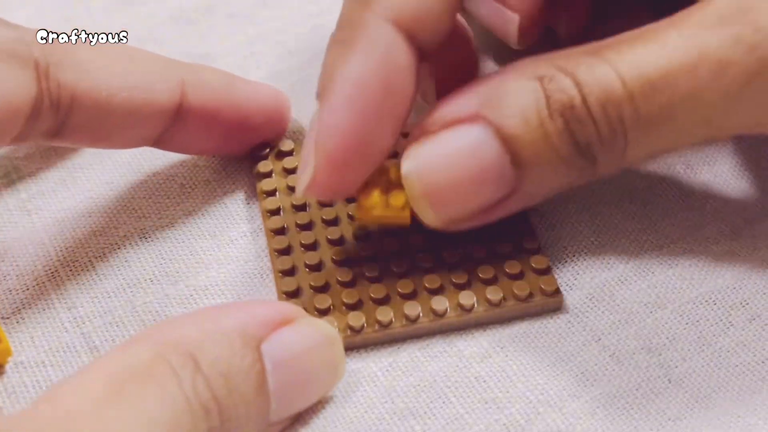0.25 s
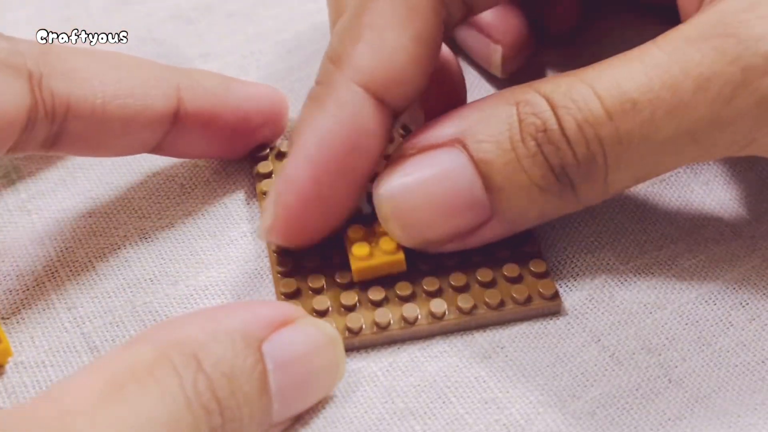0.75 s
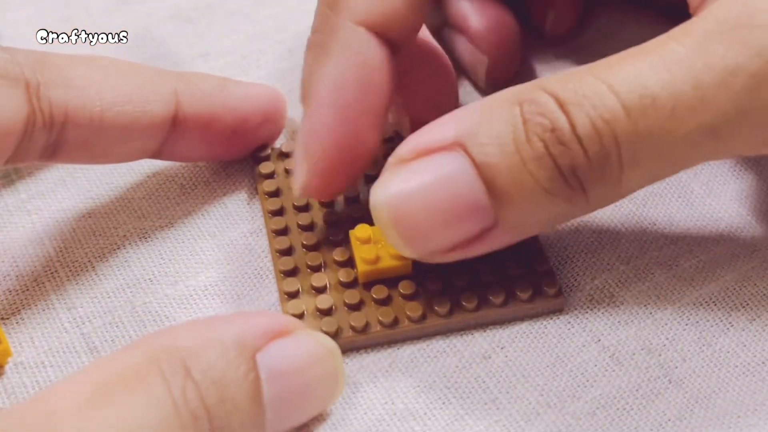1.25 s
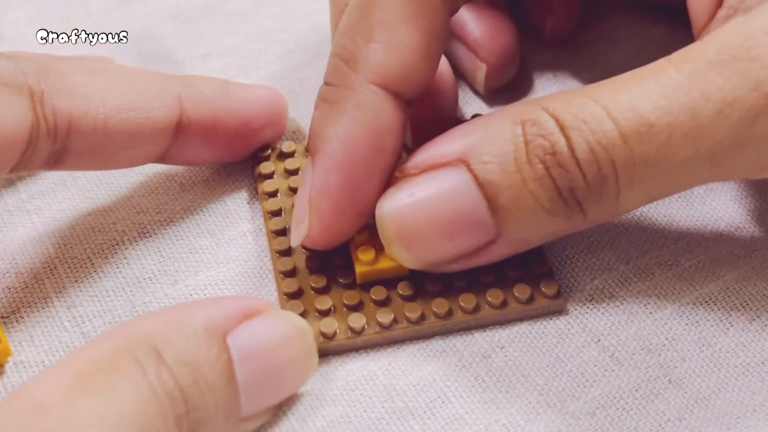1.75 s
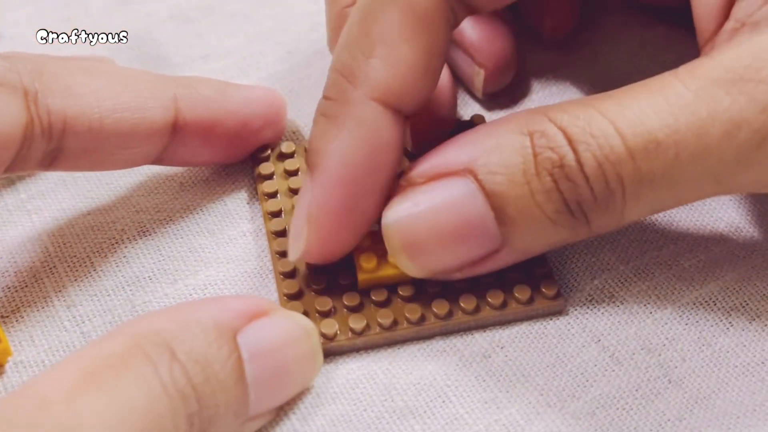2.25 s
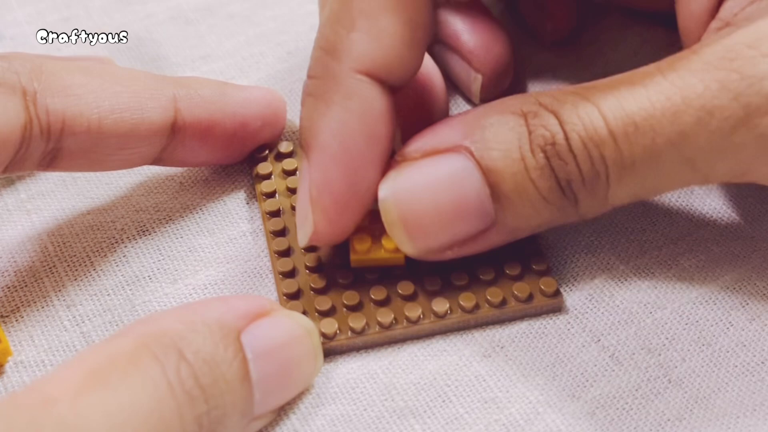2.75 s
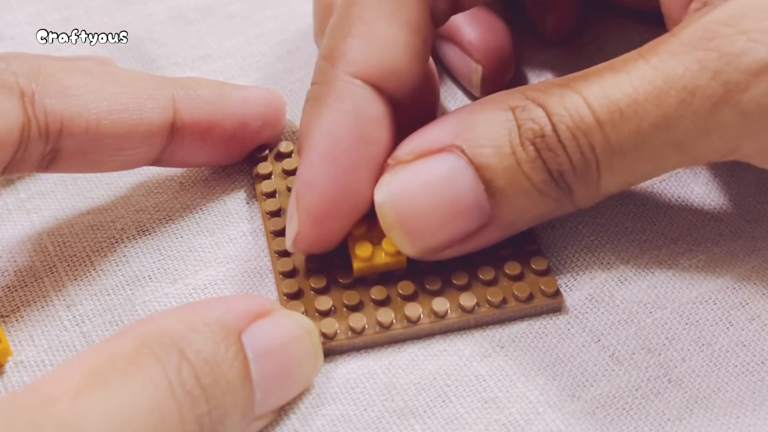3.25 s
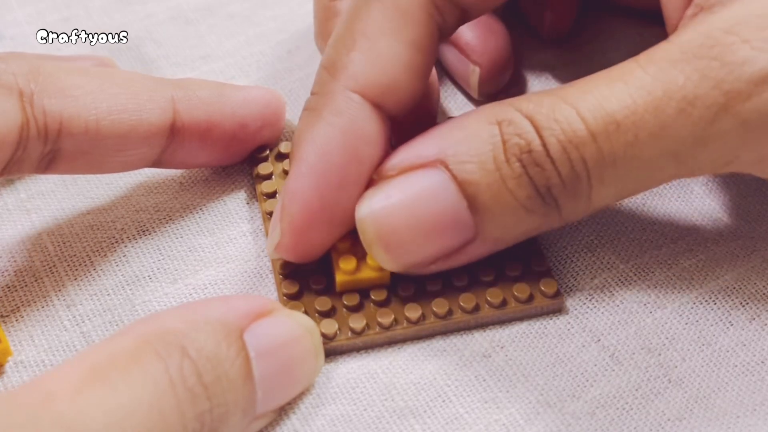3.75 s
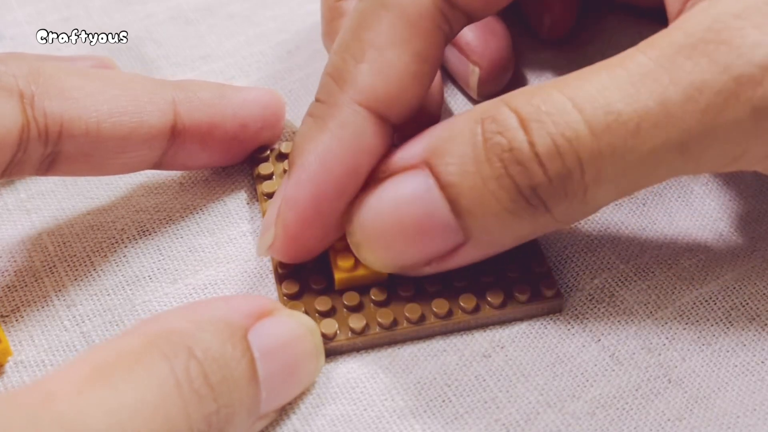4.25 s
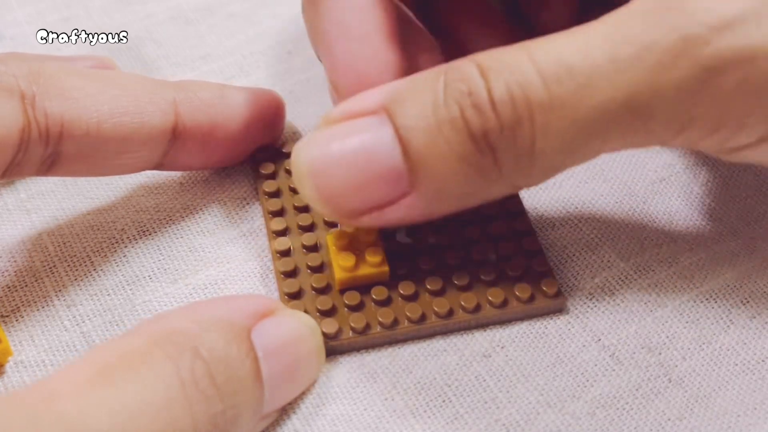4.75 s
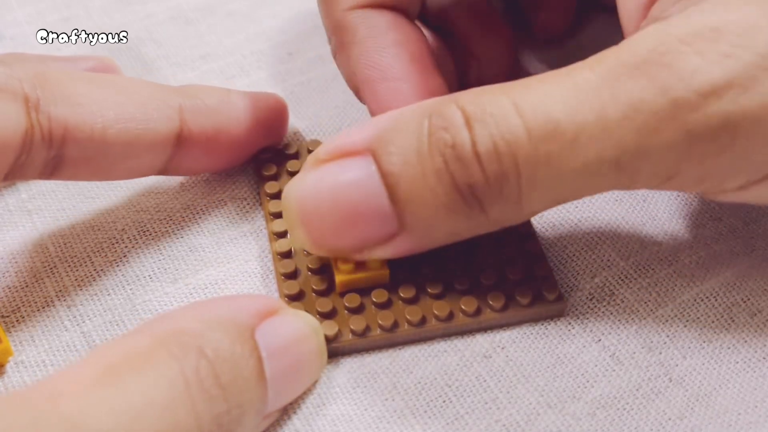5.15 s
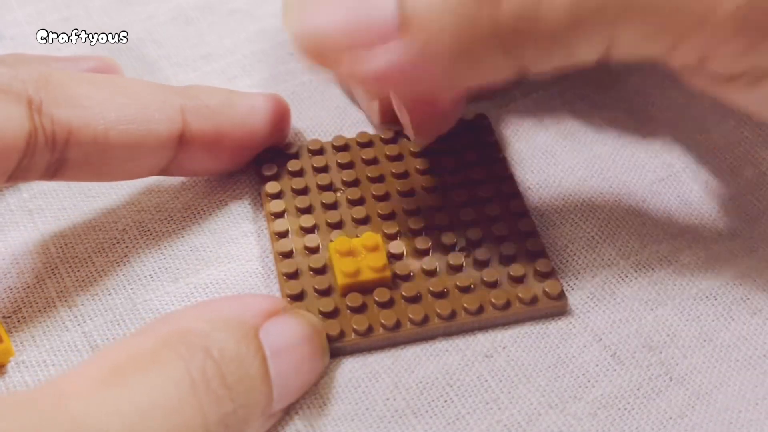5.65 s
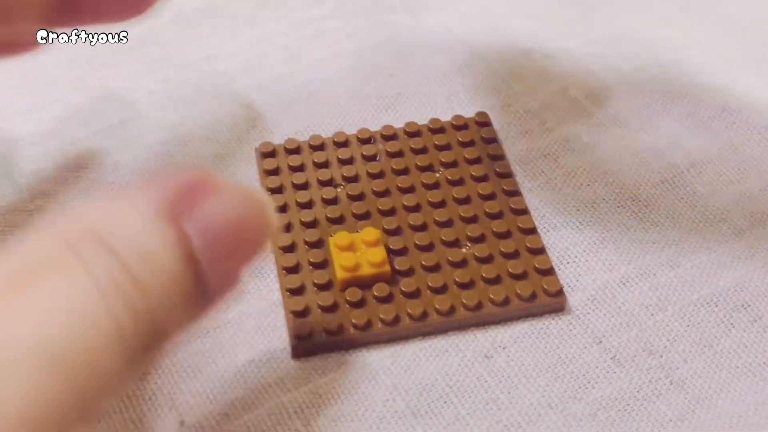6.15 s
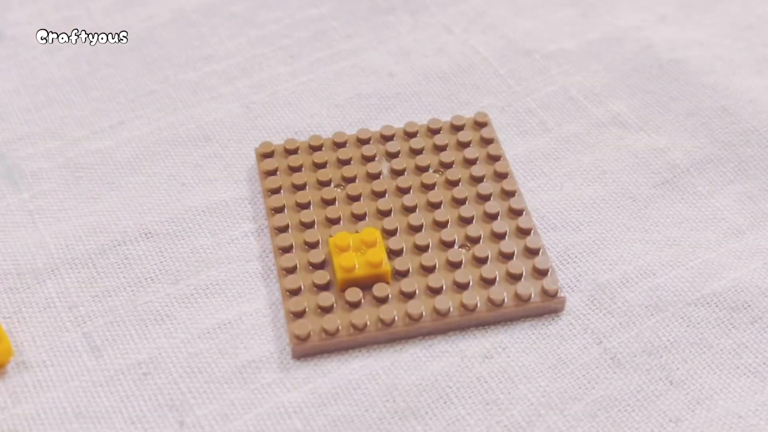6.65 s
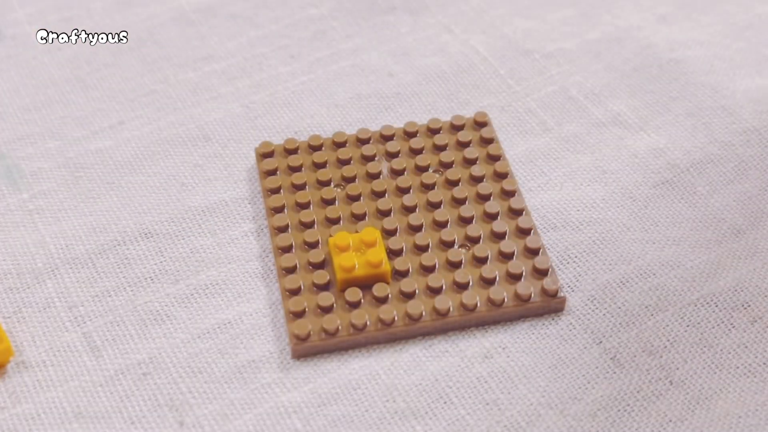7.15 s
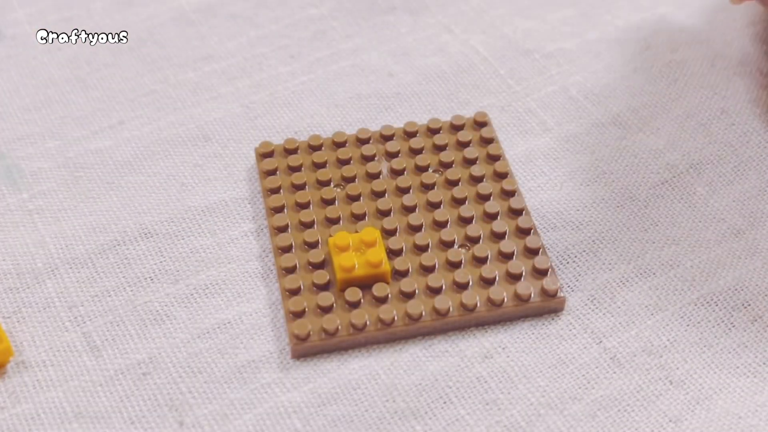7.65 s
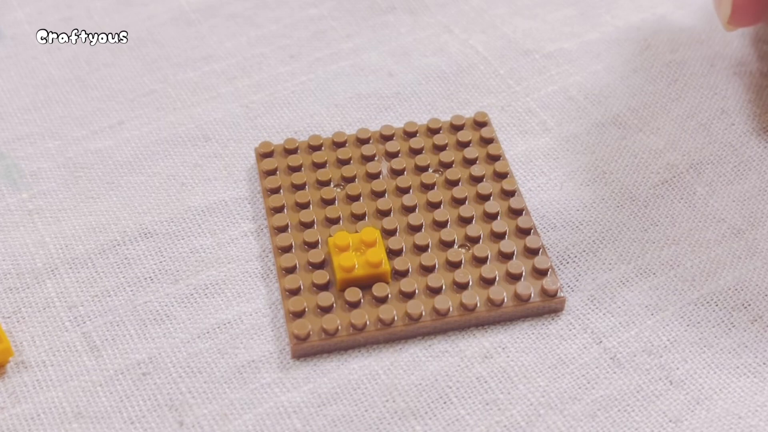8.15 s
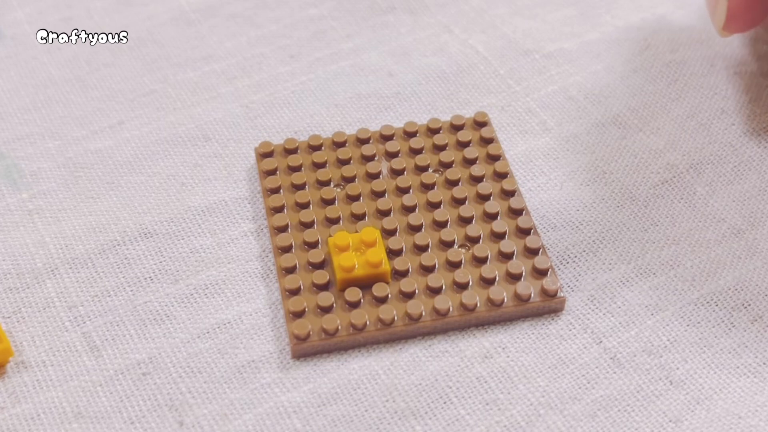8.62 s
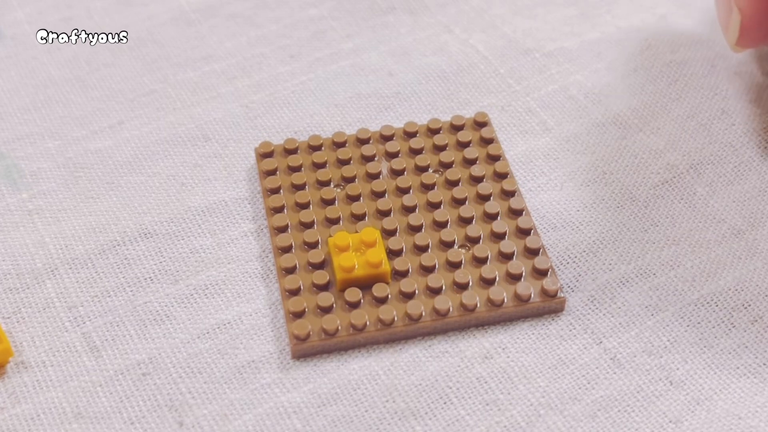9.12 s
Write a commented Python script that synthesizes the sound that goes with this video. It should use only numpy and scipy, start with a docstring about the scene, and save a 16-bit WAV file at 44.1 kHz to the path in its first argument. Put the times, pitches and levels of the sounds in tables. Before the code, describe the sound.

Tiny plastic brick ticks and scrapes over studs, snaps into place with sharp clicks, faint skin rustle, over a steady throbbing low appliance hum.

```python
"""Fingers seat a small plastic brick on a baseplate lying on a cloth-covered table, then tap it.
Brick: grainy slip forces ring damped modes of plate, brick, studs and edges, plus a dry crack;
it ticks and scrapes over the studs and creaks home in a run of snaps.
Presses thud as low table modes; skin rustles on cloth as coloured noise with tiny snags.
Behind: beating appliance motors, mains hum and whine from sines, and air from filtered noise."""
import sys
import numpy as np
from scipy import signal
from scipy.fft import rfft, irfft
from scipy.io import wavfile

SR = 44100
rng = np.random.default_rng(int(sys.argv[2]) if len(sys.argv) > 2 else 0)


def materialize(psi):
    """Save the field psi as 16-bit PCM at rate SR to the path in sys.argv[1].

    A 1-D psi becomes a single channel; in a 2-D psi each row is a channel.
    """
    bounded = np.clip(np.atleast_2d(psi).T, -1, 1)
    quanta = np.round(bounded * 32767).astype(np.int16)
    wavfile.write(sys.argv[1], SR, quanta)


N = 413658
TIME = np.arange(N) / SR
FREQS = np.arange(N // 2 + 1) * SR / N
LEAD_S = 0.003  # silence ahead of each slip in its buffer


def undb(db):
    """Decibels to gain."""
    return 10 ** (np.asarray(db) / 20)


def unit(x):
    """Scale to rms 1."""
    return x / np.sqrt(np.mean(x ** 2) + 1e-30)


def over_hz(rows, axis=1, freqs=FREQS):
    """One column of a table, interpolated along log frequency."""
    rows = np.array(rows, float)
    return np.interp(np.log(freqs + 1), np.log(rows[:, 0]), rows[:, axis])


def noise(gain):
    """Noise with the given gain at each frequency."""
    return irfft(rfft(rng.standard_normal(N)) * gain, N)


def walk(rate_hz):
    """Slow random wander of rms 1."""
    return unit(noise(1 / (1 + (FREQS / rate_hz) ** 4)))


def pan(left_minus_right_db):
    """Left and right gains for a level difference."""
    return undb(np.array([[left_minus_right_db], [-left_minus_right_db]]) / 2)


def add(out, start_s, sound):
    """Mix a stereo sound in at a time."""
    i = max(int(start_s * SR), 0)
    out[:, i:i + sound.shape[1]] += sound[:, :N - i]


def bricks(tilt_share=0.49, even_edge_db=-9):
    """Ticks, scrapes and snaps on the studs; grip tunes and damps the brick, the spot pressed tunes the plate."""
    # contacts of brick and plate: t/s, slip length/ms, brick pitch/Hz, plate pitch/Hz, ring time factor,
    # relative brick level/dB, then level re brick/dB of plate, studs, edges, dry crack
    contacts = [(0.0428, 2.3, 2720, 1160, 1.4, -56.5, 7, -20, -24, -20),
                (0.2177, 1, 3200, 1200, 1, -84, -6, 2, 10, -6),
                (0.447, 1.1, 3320, 1180, 0.57, -51.5, -20, -11, -17.5, -10),
                (0.5598, 2.1, 3500, 1190, 1, -66, -7, -6, -10, -6),
                (0.577, 0.5, 3500, 1500, .7, -54, -9, -16, -18, -8),
                (0.5837, 0.82, 3000, 1400, 0.61, -56.5, -13, -12, -19, -6),
                (0.656, 1.3, 3300, 1190, 1, -79, -3, 4, 1, -6),
                (0.725, 4.7, 3120, 1190, 1, -57, -9, -17, -22, -16),
                (0.7321, 0.7, 3180, 1190, 1, -51, -15, -12.5, -10, -16),
                (0.735, 1.2, 3240, 1190, 1.2, -50.5, -16, -9, -5.5, -7),
                (0.7384, 2.2, 3200, 1190, 1.2, -61, -16, -7, -4, -8),
                (0.746, 1.7, 3180, 1190, 1, -59, -16, -7, -18, -4),
                (0.75, 6.5, 3250, 1190, 0.8, -51, -19, -14, -17, -13),
                (0.7563, 10, 3230, 1190, 1.2, -52.5, -16, -9, -20, -15),
                (1.3416, 1.8, 2800, 1290, 0.99, -56.5, -9, -4, -11.5, -2),
                (1.4, 1.5, 2810, 1190, 1, -67.5, -8, -9, -16, -6),
                (2.4218, 0.36, 3120, 1190, 1.3, -56, -16, -10, -16, -12),
                (2.5023, 0.67, 3000, 1190, 0.91, -71.5, -3, -14, -21, -10),
                (3.085, 1.4, 3260, 1190, 0.84, -69.5, -2, -12, -21, -11),
                (3.622, 1.6, 3240, 1190, 0.9, -66, -3, -11, -7, -10),
                (3.636, 1.14, 2870, 1550, 0.46, -59.5, -5, -10, -3, 1),
                (4.0897, 6.6, 2800, 1390, 0.68, -64, 6, -16, -5, -12),
                (4.626, 28, 2960, 1190, 1, -68.5, 0, -15, -3.5, -14),
                (4.9833, 1.6, 2900, 1190, 1, -70.5, 4, -15, -8, -12),
                (5.0248, 0.66, 2930, 1330, .8, -59.5, 1.5, -14, -8, -10),
                (5.0626, 1.4, 2990, 1050, 1.2, -50, -6, -12, -2, -24),
                (5.1055, 1.3, 2900, 1350, 1, -50, -2.5, -9, -3.5, -18),
                (5.1406, 0.94, 2920, 1320, 1.1, -51, -6, -11, -2.5, -18),
                (5.181, 1.1, 3160, 1200, .9, -47.5, 0, -12, -5, -18),
                (5.2252, 0.84, 3450, 1220, 1.2, -52.5, -7, -4.5, -1.5, -8),
                (5.2267, 0.57, 3420, 1160, 1.1, -50.5, 0, -10, -12, -8),
                (5.344, 1, 2720, 1180, 1.2, -63, 5, -23, -25, -16),
                (5.4875, 0.88, 3000, 1190, 1, -73, 0, -10, -7, -5),
                (5.501, 1.5, 3200, 1190, 1.5, -73.5, -3, -7, -8, -4),
                (5.814, 2.7, 2800, 1500, 1, -66.5, 2, -9, -12, -4),
                (5.834, 2, 3400, 1190, 1, -80, -3, 9, -3, -6),
                (5.8395, 0.8, 3400, 1190, 1, -74, -3, 10, -5, -3),
                (5.921, 4.3, 2900, 1190, 4.5, -68.5, -10, -15, -6, -18),
                (6.107, 0.82, 2720, 1450, 0.54, -68.5, -6, -1, -1, 3),
                (6.393, 1.4, 3020, 1190, 1, -76, -3, -8, 3.5, -6),
                (8.41, 19, 3540, 1190, 1, -74.5, 0, -6, -16, -7),
                (9.017, 1.8, 3000, 1400, 1, -80, 18, -2, -13, 0),
                (9.055, 22, 4000, 1190, 1, -70, -8, -1, -14, -10)]
    # modes of loose brick and plate, three each for plate, brick, studs, edges: f/Hz, t60/ms, level/dB
    plastic_modes = np.array([(913, 17, 0.5), (1232, 10, -1), (1520, 11, 2), (2610, 5, 0), (3070, 6, 4.5),
                              (3620, 3.7, -0.5), (4550, 6, -1.5), (5720, 5.9, -4), (6870, 3, 0.5),
                              (9330, 3.3, -0.5), (10900, 4.8, -0.5), (12300, 1.9, 3.5)])
    out = np.zeros((2, N))
    plate_mode_hz, brick_mode_hz = plastic_modes[[1, 4], 0]
    for t_s, slip_ms, brick_hz, plate_hz, ringing, db, plate_db, stud_db, edge_db, crack_db in contacts:
        part_db = db + np.array([plate_db, 0, stud_db, edge_db])
        modes = plastic_modes * [1, ringing, 1]
        tunings = [plate_hz / plate_mode_hz, brick_hz / brick_mode_hz, 1, 1]
        # a soft contact barely rings the edges and favours lower modes (dB per octave)
        tilt_db = tilt_share * (edge_db - even_edge_db)
        body = click(modes, slip_ms, part_db, tunings, [0, tilt_db, tilt_db, tilt_db])
        add(out, t_s - LEAD_S, body + undb(db + crack_db) * crack(slip_ms))
    return out


def click(mode_table, slip_ms, part_db, tunings, tilts_db, scatter=0.029):
    """A slip rings each part of the plastic; each contact point shifts the modes a little."""
    force, out = slip(slip_ms), 0
    parts = np.split(np.array(mode_table), len(part_db))
    for modes, db, tuning, tilt_db in zip(parts, part_db, tunings, tilts_db):
        part = 0
        for k, (hz, t60_ms, mode_db) in enumerate(modes):
            hz = hz * tuning * np.exp(scatter * rng.standard_normal())
            gain = undb(mode_db + tilt_db * np.log2(hz / modes[1, 0]))
            part = part + (-1) ** k * gain * unit(ring(force, hz, t60_ms).imag)
        # each part radiates well only around its own modes
        edges_hz = [0.77 * tuning * modes[0, 0], 1.04 * tuning * modes[-1, 0]]
        band = signal.butter(1, edges_hz, "bandpass", fs=SR, output="sos")
        out = out + undb(db) * unit(signal.sosfilt(band, part))
    return from_plate(out) / 2


def slip(slip_ms, grit=0.74, flat=0.97):
    """The force of one slip: a short cluster of tiny catches with a nearly even spectrum."""
    t_s = np.arange(int(0.04 * SR)) / SR - LEAD_S
    age = np.maximum(1000 * t_s / slip_ms, 0)  # in slip lengths
    catches = rng.standard_normal(len(t_s)) * np.exp(grit * rng.standard_normal(len(t_s)))
    force = rfft(age * np.exp(-2 * age ** 2) * catches)
    size = abs(force)
    return irfft(force / (size + 0.064 * size.mean()) ** flat)


def ring(push, hz, t60_ms):
    """One damped mode driven by a force, as a rotating phasor."""
    pole = np.exp((2j * np.pi * hz - np.log(1000) * 1000 / t60_ms) / SR)
    return signal.lfilter([1, -1], [1, -pole], push)


def crack(slip_ms):
    """The dry, pitchless snap of the contact itself: a slip force without modes."""
    # passband edges: f/Hz
    band_hz = [1600, 6500]
    band = signal.butter(2, band_hz, "bandpass", fs=SR, output="sos")
    return from_plate(unit(signal.sosfilt(band, slip(slip_ms)))) / 2


def from_plate(x):
    """Carry a sound from the plate to the two sides, each with its own phase and level."""
    # stereo path from the plate: f/Hz, left lead/rad, left minus right/dB
    paths = [(550, 1, -1), (950, 1, 4), (1500, 2, 7), (2280, 0.86, 4.5), (3200, 1.25, 7), (4370, 1.3, 6.5),
             (5140, 1.9, 6.5), (8930, -4, -1.5), (10200, -5, 0), (13300, -7.5, -0.5), (15300, -9, 0.5)]
    freqs = np.fft.rfftfreq(len(x), 1 / SR)
    level = undb(over_hz(paths, axis=2, freqs=freqs) / 2)
    lean = level * np.exp(0.5j * over_hz(paths, freqs=freqs))
    sides = np.array([lean, 1 / lean])
    sides = sides / np.sqrt(np.mean(abs(sides) ** 2, axis=0))
    return irfft(rfft(x) * sides, len(x))


def taps():
    """The seated brick and the plate ring as one body when a finger lands or lets go."""
    # finger contacts: t/s, slip length/ms, then relative level/dB of plate, bending plate, brick, studs, edges
    touches = [(5.3943, 2.1, -53, -54, -62, -66, -61), (9.0452, 1.1, -43, -62, -46.5, -53, -55.5),
               (9.2263, 2.8, -67, -50, -61, -55.5, -61)]
    # modes once locked together, three for each of those five parts: f/Hz, t60/ms, level/dB
    seated_modes = [(730, 27, 1.5), (1240, 8.3, -1.5), (1660, 13, 4), (1930, 13, 4.5), (2300, 14, -2.5),
                    (3000, 12, 3.5), (3670, 13, 0), (4000, 13, -2), (4870, 5.9, 4.5), (5650, 9, 1),
                    (6320, 6.4, -4), (7240, 4, 1), (8850, 4, 3.5), (11000, 4.3, -1), (12800, 3, 1)]
    out = np.zeros((2, N))
    for t_s, slip_ms, *part_db in touches:
        tunings, tilts_db = np.ones(len(part_db)), np.zeros(len(part_db))
        add(out, t_s - LEAD_S, click(seated_modes, slip_ms, part_db, tunings, tilts_db))
    return out


def table(spread_rad=0.48, scuff_db=1, scuff_s=0.015, bloom_cycles=0.4):
    """A press through the cloth: high modes die at once, a low one booms on; soft fingers reach only the lowest."""
    # presses that reach the table: t/s, relative level/dB, contact hardness as corner f/Hz
    presses = [(0.0453, -27.5, 330), (0.104, -33, 170), (1.343, -20.5, 62), (5.062, -50, 1200),
               (5.106, -49, 1200), (5.141, -48, 1200), (5.182, -47, 750), (5.226, -37, 900),
               (5.345, -30.5, 650), (5.358, -41, 300), (5.396, -37, 450), (9.029, -29, 65),
               (9.0466, -40, 1300)]
    # table modes: f/Hz, t60/ms, level/dB
    table_modes = [(88, 130, -8), (121.5, 175, 1), (238, 63, -3), (335, 43, 1.5), (461, 47, -4),
                   (580, 32, -1.5), (790, 16, -6)]
    out, t = np.zeros((2, N)), np.arange(SR // 3) / SR
    for t_s, db, corner_hz in presses:
        # the plate scuffs on the cloth as it is pushed down
        dull = signal.butter(2, corner_hz, fs=SR, output="sos")
        scuff = rng.standard_normal((2, len(t))) * np.exp(-t / scuff_s)
        thud = undb(scuff_db) * signal.sosfilt(dull, scuff)
        for k, (hz, t60_ms, mode_db) in enumerate(table_modes):
            phase = spread_rad * hz / 600 * rng.standard_normal((2, 1))  # spread at 600 Hz
            fade = np.exp(-np.log(1000) * 1000 * t / t60_ms)
            bloom = 1 - np.exp(-(t * hz / bloom_cycles) ** 2)
            gain = (-1) ** k * undb(mode_db) / (1 + (hz / corner_hz) ** 2)
            thud = thud + gain * bloom * fade * np.sin(2 * np.pi * hz * t + phase)
        add(out, t_s, undb(db) * thud)
    return out


def rustle(rub_db=11.5, grain_db=-0.5, catch_db=1.5, apart=0.11, snag_db=-9, snags_per_s=90, resting_db=-102):
    """Skin drags over threads: a fine grainy hiss, with tiny ticks where a thread snags and lets go."""
    # strokes of skin over cloth and plastic: start t/s, length/s, level before rub_db/dB
    strokes = [(-0.04, 0.19, -80.5), (0.148, 0.16, -91.5), (0.516, 0.27, -89), (0.958, 0.078, -92.5),
               (1.59, 0.056, -87), (2.019, 0.28, -100), (3.37, 0.099, -100), (3.58, 0.077, -85.5),
               (4.053, 0.042, -86), (4.274, 0.046, -92), (4.423, 0.48, -92.5), (4.986, 0.56, -88.5),
               (5.205, 0.092, -82), (5.676, 0.25, -76.5), (6.034, 0.088, -88.5), (6.23, 0.089, -87.5),
               (6.368, 0.086, -81), (6.508, 0.14, -83.5), (7.016, 0.52, -94), (7.63, 0.057, -95),
               (8.164, 0.062, -91), (9.058, 0.045, -90), (9.115, 0.14, -80.5), (9.254, 0.033, -71.5)]
    # relative spectrum of the rub: f/Hz, density/dB per Hz
    rub_colour = [(300, -8), (1500, 7), (3000, 3.5), (4500, 2), (6500, 0), (8200, -3.5), (10500, 4.5),
                  (13000, 5), (15500, -10.5)]
    colour = undb(over_hz(rub_colour))
    snags = (rng.random(N) < snags_per_s / SR) * rng.standard_normal(N)
    drag = unit(rng.standard_normal(N)) + undb(snag_db) * unit(snags)
    hiss = from_plate(irfft(rfft(drag) * colour, N))
    hiss = hiss + apart * np.array([noise(colour), noise(colour)])
    grains = undb(grain_db * walk(390) + catch_db * walk(32))
    power = undb(resting_db) ** 2  # fingers that only lie on plate and cloth
    for start_s, length_s, db in strokes:
        power = power + (undb(db) * stroke(start_s, length_s)) ** 2
    return unit(hiss * grains) * undb(rub_db) * np.sqrt(power)


def stroke(start_s, length_s, attack_s=0.033, release_s=0.033, arch_db=3.5):
    """A finger gathers speed, slides fastest in mid-stroke and comes to rest."""
    rise = np.clip((TIME - start_s) / attack_s, 0, 1)
    arch = np.sin(np.pi * np.clip((TIME - start_s) / (length_s + attack_s), 0, 1))
    release = np.exp(-np.maximum(TIME - start_s - length_s, 0) / release_s)
    return rise * undb(arch_db * (arch - 1)) * release


def hum(mains_drift_rad=0.077, whine_drift_rad=0.02, waver_db=0.85, whine_waver_db=2.5,
        drone_left_db=4.0, shaft_hz=58.25):
    """The motors rumble, throb in narrow low bands and whine over the mains hum."""
    # throbbing bands: f/Hz, nominal width/Hz, level before rumble level/dB
    drone = [(56.3, 5.3, -59), (92.56, 1.7, -59.5), (113, 5.7, -59.5)]
    # level of rumble and throb: t/s, level/dB
    rumble_level = [(0, 1.5), (1.6, 1.5), (3.2, -1.5), (4.6, -4.5), (6.4, 0.5), (7.6, 0.5), (9.38, 1)]
    # mains hum: f/Hz, level/dB, left minus right/dB, left lead/rad
    mains = [(240, -43.5, 4, 0.22), (480, -70.5, -8.5, 0.98)]
    # motor whine: shaft order (rounded for pitch), level/dB, level offset/dB,
    # left minus right/dB, left lead/rad
    whine = [(9, -69, 3.5, -14.5, 3), (15, -81, 0.5, 0.5, 0), (18, -87.5, 6.5, -0.5, 1.5),
             (20, -76.5, 7.5, 1, 2.5), (22, -76.5, -4, -4, -0.7), (24, -67.5, -9.5, -5, 1.8),
             (31.2, -88.5, 7, -2, -0.5), (32, -86.5, 1, -5.5, -1.5), (35, -74.5, -2.5, 1, -0.7),
             (36.5, -79.5, -2.5, 3.5, -1)]
    # share of the whine's level offset: t/s, share/0-1
    offset_share = [(5.6, 0.9), (6.0, 1), (9.0, 1), (9.2, 0.4)]
    out = rumble()
    for hz, width_hz, db in drone:
        band = unit(noise(1 / (1 + ((FREQS - hz) / width_hz * 1.47) ** 2)))
        out = out + undb(db) * band * pan(drone_left_db * hz / 100)
    out = out * undb(np.interp(TIME, *np.transpose(rumble_level)))
    for hz, db, left_db, lead_rad in mains:
        sine = tone(round(hz / 60) * 60, mains_drift_rad, lead_rad)
        out = out + undb(db + waver_db * walk(1)) * pan(left_db) * sine
    # each whine tone has its own level offset, nearly steady until it eases off near the end
    share = np.interp(TIME, *np.transpose(offset_share))
    for order, db, offset_db, left_db, lead_rad in whine:
        level_db = db + offset_db * share + whine_waver_db * walk(1)
        sine = tone(round(order) * shaft_hz, whine_drift_rad * order, lead_rad)
        out = out + undb(level_db) * pan(left_db) * sine
    return out


def rumble(left_db=3.0, in_step_s=2.87):
    """Motors at slightly different rates beat against each other and swell together when they fall in step."""
    # turning rate of each motor: f/Hz
    motor_hz = [58.33, 53.95, 59.17]
    # same motors, before rumble level: level/dB at the turning rate, at twice, at three times
    motor_db = [(-44.5, -52.5, -55.5), (-53.5, -56.5, -76), (-57, -67.5, -57)]
    out, start = 0, rng.random()
    for hz, levels_db in zip(motor_hz, motor_db):
        turns = hz * (TIME - in_step_s) + start
        out = out + undb(levels_db[0]) * np.sin(2 * np.pi * turns)
        for k, db in enumerate(levels_db[1:], 2):
            overtone = np.sin(2 * np.pi * (k * turns + rng.random()))
            out = out + undb(db) * pan(left_db * k / 2) * overtone
    return out


def tone(hz, drift_rad, lead_rad=0):
    """A stereo sine whose phase wanders slowly."""
    phase = 2 * np.pi * (hz * TIME + rng.random()) + drift_rad * walk(0.94)
    return np.sin(phase + np.array([[lead_rad], [0]]))


def air(swell_db=1.02):
    """Gently wavering rush of moving air, mostly alike on both sides in the bass and diffuse above."""
    # room air: f/Hz, density/dB per Hz
    air_spectrum = [(20, -97), (40, -74.5), (100, -70), (150, -76), (320, -79), (470, -85), (620, -86),
                    (1200, -100), (2050, -103), (2350, -112), (3700, -119), (4600, -117), (6200, -126),
                    (15000, -138)]
    # stereo balance of the air: f/Hz, side minus mid/dB, left minus right/dB
    air_stereo = [(63.4, -30, 3.5), (188, -9.5, -3.5), (365, -9, -0.5), (617, 6, 2), (1190, -1, 3.5),
                  (2380, -1.5, 4.5), (4160, 1, 9), (8100, 10.5, 0.5)]
    gain = undb(over_hz(air_spectrum)) * np.sqrt(SR / 2)
    width, lean = undb(over_hz(air_stereo)), undb(over_hz(air_stereo, axis=2) / 2)
    mid, side = rfft(rng.standard_normal((2, N))) * gain / np.sqrt(1 + width ** 2)
    left, right = (mid + width * side) * lean, (mid - width * side) / lean
    return irfft(np.array([left, right]), N) * undb(swell_db * walk(4.9))


def room(x, wet_db=-28, t60_s=0.1, build_s=0.007, dull_hz=5000):
    """A faint short tail from the furnished room: decaying, dulled noise."""
    t = np.arange(SR // 3) / SR
    envelope = np.exp(-np.log(1000) * t / t60_s) * (1 - np.exp(-t / build_s))
    dull = signal.butter(1, dull_hz, fs=SR, output="sos")
    tail = signal.sosfilt(dull, rng.standard_normal((2, len(t))) * envelope)
    tail = unit(tail) / np.sqrt(len(t))
    return x + undb(wet_db) * signal.fftconvolve(x, tail, axes=1)[:, :N]


def scene():
    """Hands and bricks in front, air and hum behind."""
    return room(bricks() + taps() + table() + rustle()) + air() + hum()


def record(dry, dip_s=9.1435, dip_half_s=0.003, top_hz=15600):
    """The level dips briefly; a steep low-pass ends the treble."""
    dip = 1 - np.exp(-((TIME - dip_s) / dip_half_s) ** 4)
    low_pass = signal.ellip(8, 0.2, 70, top_hz, fs=SR, output="sos")
    return signal.sosfilt(low_pass, dry * dip)


dry = scene()
out = record(dry)
materialize(out)
```